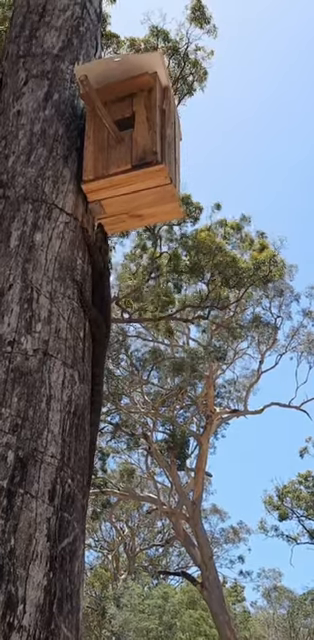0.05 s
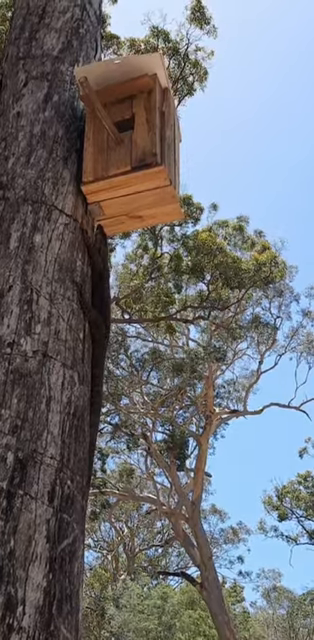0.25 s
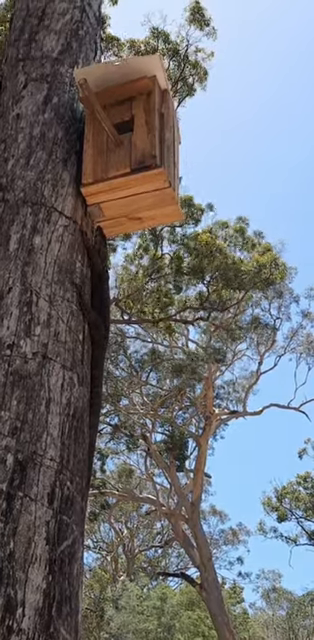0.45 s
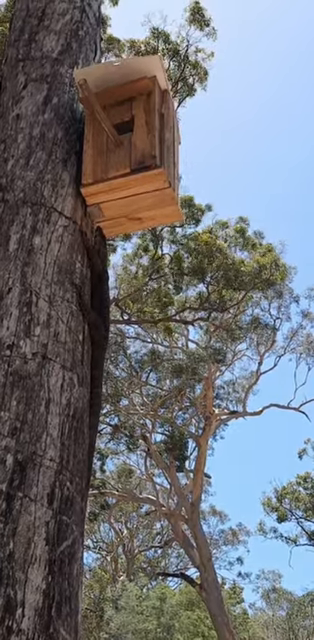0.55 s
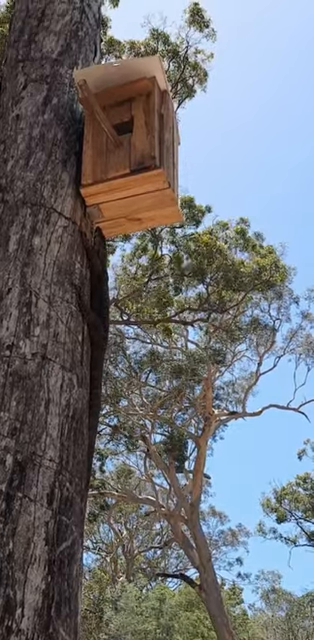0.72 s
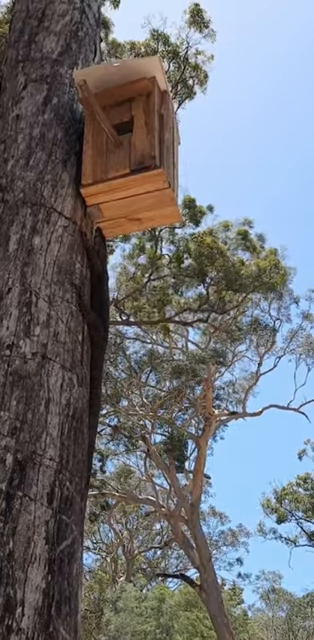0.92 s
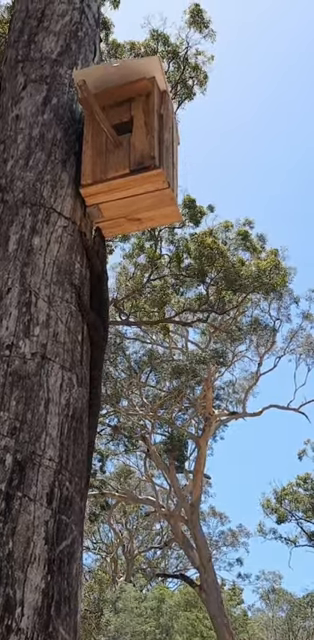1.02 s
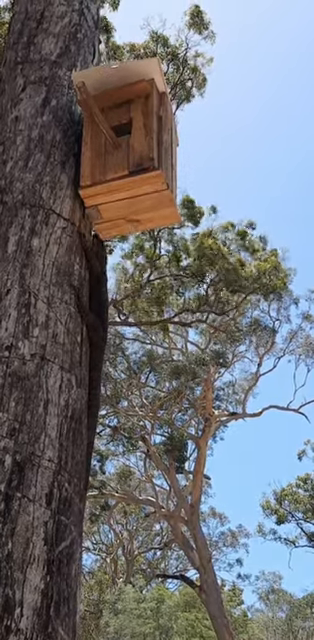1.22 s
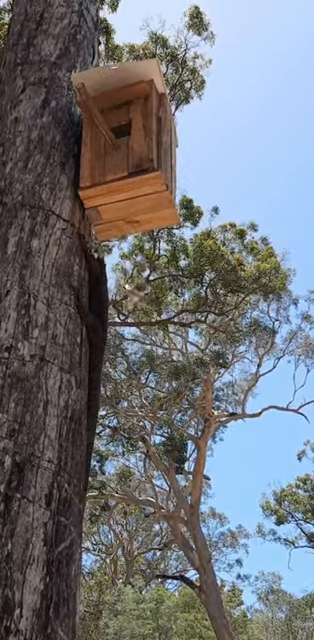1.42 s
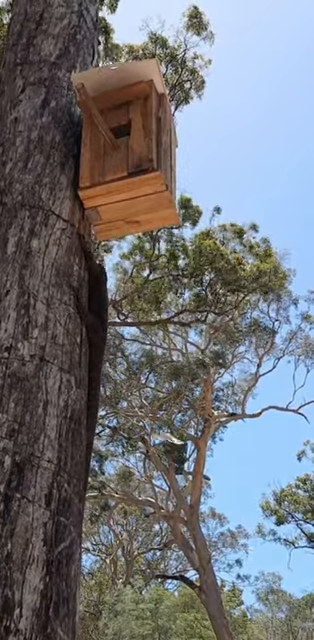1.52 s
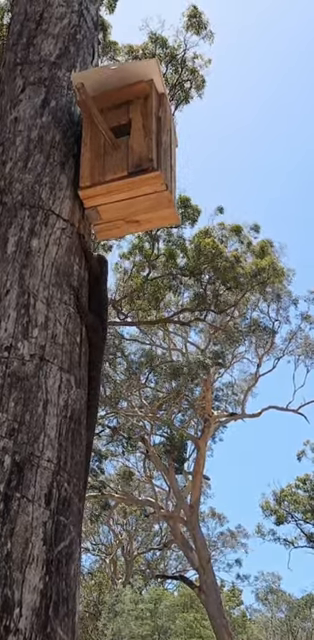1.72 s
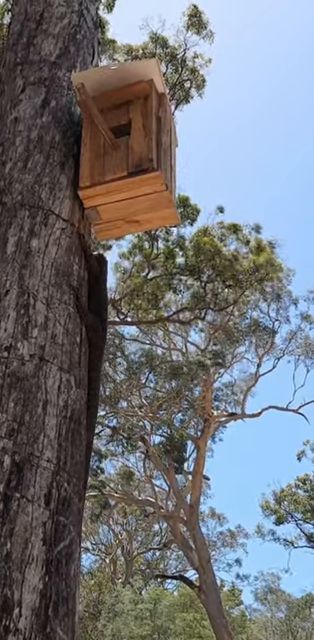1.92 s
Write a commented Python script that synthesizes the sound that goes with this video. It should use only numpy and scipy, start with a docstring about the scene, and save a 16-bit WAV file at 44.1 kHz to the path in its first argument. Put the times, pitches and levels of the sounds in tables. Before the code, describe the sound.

A parrot, probably a cockatoo, gives one short, harsh screech among tall trees. Before it, wind buffets the microphone in uneven low gusts, mostly on the left, over a steady soft hiss of leaves.

```python
"""Wind buffets the microphone, mainly its left port, over a steady hiss of leaves and a far, low rush.
About 1.5 s in, a parrot, probably a cockatoo, gives one harsh screech among the tall trees.
Its voice is mostly chaotic and catches a clean pitch for a few instants;
trunks and ground answer briefly."""
import sys
import numpy as np
from scipy import signal
from scipy.fft import rfft, irfft, next_fast_len
from scipy.io import wavfile
from scipy.ndimage import uniform_filter1d, map_coordinates

SR = 44100
rng = np.random.default_rng(int(sys.argv[2]) if len(sys.argv) > 2 else 0)


def master_out(mix):
    """Clip the mix to full scale and print it as 16-bit PCM to the path in sys.argv[1]."""
    frames = np.transpose(np.atleast_2d(mix))
    ceiling = np.clip(frames, -1, 1)
    pcm = np.round(ceiling * 32767).astype(np.int16)
    wavfile.write(sys.argv[1], SR, pcm)


N = 85995

# How hard the bird calls. Each row: time in seconds, relative level in dB.
CALL_EFFORT = [(1.509, -67.5), (1.517, -42), (1.524, -34.5), (1.534, -33.5), (1.545, -35.5), (1.579, -37.5),
               (1.595, -38), (1.617, -39.5), (1.67, -35.5), (1.689, -41), (1.715, -40.5), (1.742, -41.5),
               (1.762, -50), (1.785, -64)]
# Its changing colour. Each row: time in seconds, then treble, low partials and beak resonance in dB.
CALL_COLOUR = [(1.52, -1, 0.5, -6), (1.54, -1, 0.5, -11), (1.565, -1.5, 9.5, -6), (1.578, -18, 10, -11),
               (1.592, 3.5, 6.5, 4.5), (1.625, 0.5, 5, 2), (1.67, 0, 1, 0.5), (1.7, -1, 3, 0),
               (1.75, -1, 0, -3)]


def amp(db):
    """Decibels to gain."""
    return 10 ** (np.asarray(db) / 20)


def unit(x):
    """Scale to rms 1."""
    return x / np.sqrt(np.mean(x ** 2) + 1e-20)


def gain_at(points, hz):
    """Gain read from (Hz, dB) points on a log frequency axis."""
    point_hz, db = np.transpose(points)
    return amp(np.interp(np.log(hz + 1), np.log(point_hz + 1), db))


def curves(rows):
    """One value per sample for each column after the time."""
    times, *columns = np.transpose(rows)
    return [np.interp(np.arange(N) / SR, times, column) for column in columns]


def wobble(per_s):
    """A smooth random curve with per_s knots a second."""
    return map_coordinates(rng.standard_normal(N // 4), [np.arange(N) * per_s / SR], mode="wrap")


def filtered(x, response):
    """Filter x by a gain given as a function of Hz."""
    size = next_fast_len(N + SR // 2)
    return irfft(rfft(x, size) * response(np.fft.rfftfreq(size, 1 / SR)), size)[..., :N]


def noise(spectrum, channels=1):
    """Coloured noise of rms 1, unrelated between channels."""
    return unit(filtered(rng.standard_normal((channels, N)), lambda hz: gain_at(spectrum, hz)))


def panned(x, tilt):
    """Share each frequency between the ports at constant power."""
    def gains(hz):
        ratio = gain_at(tilt, hz)
        return np.array([ratio, np.ones_like(ratio)]) * np.sqrt(2 / (1 + ratio ** 2))
    return filtered(x, gains)


def port_hiss():
    """Faint, even self-noise of the microphone's left port."""
    # Each row: frequency in Hz, relative level in dB.
    spectrum = [(3000, -23), (7000, -20), (10000, 1), (14000, 0), (15800, -5)]
    return noise(spectrum) * amp(-64) * np.array([[1], [0]])


def leaves():
    """Foliage hisses with the breeze, over a far rush of the woods that reaches both ports alike."""
    # The breeze. Each row: time in seconds, level in dB.
    breeze = [(0, -48.5), (.17, -50), (.3, -47), (.5, -47.5), (1, -47.5), (1.23, -47.5), (1.3, -55),
              (1.48, -54.5), (1.7, -51.5), (1.95, -55)]
    # Leaves and far rush. Each row: frequency in Hz, relative level in dB.
    leaf_spectrum = [(150, -11), (330, 4.5), (600, -6), (1000, -4), (1800, -3), (2800, -2.5), (4000, -7),
                     (6200, -8.5), (8000, -12.5), (10000, -16.5), (13500, -13.5), (15800, -20)]
    far_spectrum = [(120, -53), (220, -16.5), (310, 3.5), (450, -2.5), (700, -4.5), (1100, -10.5),
                    (2000, -45.5), (3000, -38)]
    # Left-right balance of the hiss; the right port is dull around 8-12 kHz.
    # Each row: frequency in Hz, left over right in dB.
    tilt = [(300, 5.5), (1300, 3.5), (2500, -1.5), (5500, -2), (7000, 7), (9000, 37), (11000, 28),
            (13500, 13.5), (15500, 14)]
    breeze_db, = curves(breeze)
    hiss = panned(noise(leaf_spectrum, channels=2), tilt) * amp(breeze_db + 0.4 * wobble(per_s=23.4))
    far_rush = noise(far_spectrum) * amp(-54 + 0.85 * (breeze_db - breeze_db.max()))
    return hiss + far_rush


def buffeting():
    """Eddies thump each port separately, as strongly as the gust presses on it; a few hit harder."""
    # Wind pressure on each port. Each row: time in seconds, level in dB.
    left_gust = [(0, -45), (.17, -46), (.215, -26), (.3, -27), (.44, -23), (.55, -36.5), (.65, -26),
                 (.7, -32.5), (.77, -18), (.81, -28), (.87, -26), (.945, -45.5), (.98, -28.5), (1.05, -24),
                 (1.09, -19.5), (1.19, -16), (1.245, -21.5), (1.262, -55), (1.34, -81), (1.95, -66.5)]
    right_gust = [(0, -47), (.14, -54.5), (.34, -48.5), (.4, -42), (.52, -39.5), (.58, -54), (.68, -44),
                  (.79, -63.5), (.9, -35.5), (.95, -57), (1.02, -41), (1.09, -42), (1.16, -47.5),
                  (1.29, -47.5), (1.41, -66.5), (1.62, -48.5), (1.75, -55.5), (1.95, -46.5)]
    # The eddies' rumble. Each row: frequency in Hz, relative level in dB.
    spectrum = [(20, -35), (40, -13), (60, 1.5), (90, 2), (130, -3), (170, -8.5), (235, -23), (305, -20),
                (400, -35.5), (550, -43), (2000, -79)]
    # Hard eddies on the left. Each row: centre in seconds, peak in dB, pitch in Hz, half-width in seconds.
    thumps = [(0.212, -25.5, 238, 0.0027), (0.757, -19.5, 286, .003), (1.235, -19, 161.5, 0.0088)]
    t = np.arange(N) / SR
    eddies = noise(spectrum, channels=2)
    local_rms = np.sqrt(np.abs(uniform_filter1d(eddies ** 2, size=1800, axis=1)) + 1e-6)
    gust_db = np.vstack([curves(left_gust), curves(right_gust)])
    left, right = eddies / local_rms * amp(gust_db)
    for centre, db, hz, width in thumps:
        left -= amp(db) * np.cos(2 * np.pi * hz * (t - centre)) * np.exp(-((t - centre) / width) ** 2)
    return np.array([left, right])


def scatter(t60):
    """Stereo response of many small reflections, dying by 60 dB in t60 seconds."""
    lag = np.arange(SR // 3) / SR
    onset = 1 - np.exp(-lag / 0.0016)
    response = rng.standard_normal((2, len(lag))) * amp(-60 * lag / t60) * onset
    return response / np.linalg.norm(response, axis=1, keepdims=True)


def woods(call):
    """The direct path, then scatter off trunks and ground and a faint tail, shifting as the bird moves."""
    # Left-right balance of the call; the right port is dull near 9 kHz.
    # Each row: frequency in Hz, left over right in dB.
    tilt = [(300, 2.5), (1500, 4), (2800, -4.5), (4200, 0.5), (5500, -1.5), (7000, 2), (9000, 10),
            (13000, 2), (15500, 4)]
    left_lead_s, path_change_s, mono_below_hz = 0.000453, 0.04, 940
    t = np.arange(N) / SR
    direct = filtered(call, lambda hz: np.exp(1j * np.pi * hz * left_lead_s * np.array([[1], [-1]])))
    echoes = np.zeros((2, N))
    for centre in np.arange(CALL_EFFORT[0][0], CALL_EFFORT[-1][0] + path_change_s, path_change_s):
        piece = call * np.sqrt(np.clip(1 - np.abs(t - centre) / path_change_s, 0, 1))
        paths = scatter(t60=0.021) + amp(-18.5) * scatter(t60=0.26)
        echoes += signal.fftconvolve(piece[None], paths, axes=1)[:, :N]
    heard = direct + echoes
    low_side = filtered(heard - heard.mean(axis=0), lambda hz: 1 / (1 + (hz / mono_below_hz) ** 10))
    return panned(heard - low_side, tilt)


def husk(effort_db):
    """Hollow, low noise under the voice, swelling gently with effort (0 dB is full effort)."""
    # Each row: frequency in Hz, relative level in dB.
    spectrum = [(150, -32), (280, -5.5), (400, 0.5), (600, -5), (900, -11), (2000, -47)]
    return noise(spectrum)[0] * amp(-52 + 0.46 * effort_db)


def sizzle(effort_db):
    """Noise high above the voice, heard only near full effort and following the voice's treble."""
    # Each row: frequency in Hz, relative level in dB.
    spectrum = [(5000, -34), (8000, -3), (9000, -14), (11500, -9), (13000, -2.5), (14300, -1.5),
                (15000, -10), (15800, -16)]
    treble_db, _, _ = curves(CALL_COLOUR)
    return noise(spectrum)[0] * amp(-50 + 1.9 * (effort_db + treble_db))


def voice():
    """One pitch line, now a clean tone, now chaotic pulses and air fluttering through the throat."""
    # Each row: time in seconds, pitch in Hz, roughness (0 is clean, 1 or more fully rough).
    contour = [(1.52, 1540, 1.07), (1.533, 1490, 0.65), (1.545, 1468, 1.1), (1.562, 1569, 0.93),
               (1.583, 1500, 1), (1.59, 1364, 0.17), (1.6, 1384, 0.1), (1.608, 1436, 1),
               (1.618, 1680, 0.63), (1.632, 1558, 0.54), (1.642, 1423, 0.2), (1.653, 1445, 0.85),
               (1.662, 1396, .25), (1.672, 1336, 0), (1.68, 1374, 1), (1.7, 1336, 0.97), (1.76, 1268, 1.1)]
    # Harmonics of the clean tone, from the first up, in relative dB.
    partials_db = [-11, -4.5, 0.5, -4.5, -16]
    # Throat and open beak. Each row: frequency in Hz, relative gain in dB.
    throat = [(150, -35), (330, -10.5), (600, -13), (1000, -16), (1300, -9), (1700, -13), (2400, -8.5),
              (2950, 0), (3700, -1), (4300, -6), (4900, -6.5), (5700, -0.5), (6400, -12.5), (7300, -19),
              (9000, -40), (11000, -44), (15800, -47)]
    pitch_hz, roughness = curves(contour)
    roughness = np.clip(roughness, 0, 1)

    def phase(jitter):
        return 2 * np.pi * np.cumsum(pitch_hz * (1 + jitter * wobble(per_s=1500))) / SR
    steady, chaotic = phase(jitter=0.028), phase(jitter=0.0994)
    tone = unit(sum(amp(db) * np.sin(k * steady) for k, db in enumerate(partials_db, 1)))
    pulses = unit(sum(np.cos(k * chaotic) for k in range(1, 12)))
    flutter = amp(2.5 * wobble(per_s=600))
    air = amp(3) * rng.standard_normal(N)
    rasp = unit(filtered((pulses + air) * flutter, lambda hz: gain_at(throat, hz)))
    return np.sqrt(roughness) * rasp + amp(-4) * np.sqrt(1 - roughness) * tone


def coloured(sound):
    """Treble, low partials and beak resonance each rise and fall within the call."""
    treble_hz, low_hz, beak_hz, beak_width_hz = 3600, 2270, 4320, 720
    treble_db, low_db, beak_db = curves(CALL_COLOUR)
    bands = [(treble_db, lambda hz: 1 - 1 / (1 + (hz / treble_hz) ** 10)),
             (low_db, lambda hz: 1 / (1 + (hz / low_hz) ** 10)),
             (beak_db, lambda hz: np.exp(-((hz - beak_hz) / beak_width_hz) ** 2))]
    for db, band in bands:
        sound = sound + (amp(db) - 1) * filtered(sound, band)
    return sound


def screech():
    """The call at the beak: the bird's effort drives the voice, the sizzle above and the husk below."""
    t = np.arange(N) / SR
    calling = (t > CALL_EFFORT[0][0]) & (t < CALL_EFFORT[-1][0])
    level_db, = curves(CALL_EFFORT)
    effort_db = level_db - level_db.max()
    return (coloured(voice()) * amp(level_db + 2) + sizzle(effort_db) + husk(effort_db)) * calling


def scene():
    """Foliage all round, wind right on the microphone and the bird among the trees."""
    return leaves() + buffeting() + woods(screech()) + port_hiss()


def record(dry):
    """The microphone chain passes nothing above its band limit."""
    return filtered(dry, lambda hz: hz < 15800)


dry = scene()
out = record(dry)
master_out(out)
```